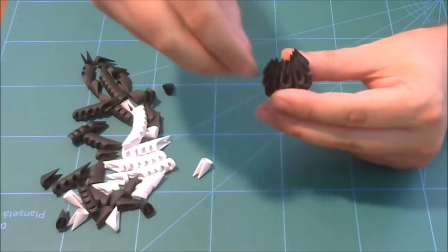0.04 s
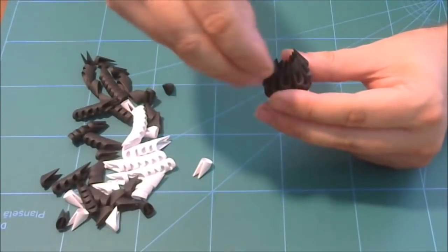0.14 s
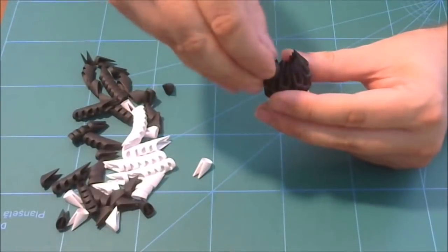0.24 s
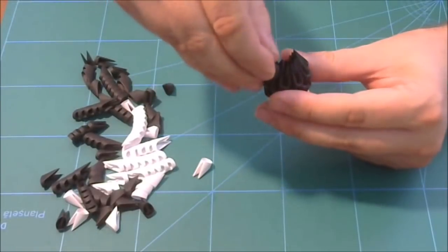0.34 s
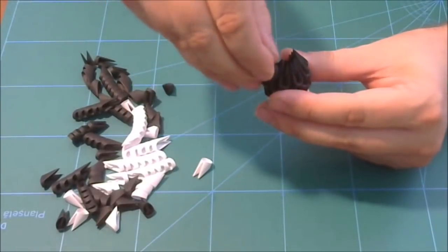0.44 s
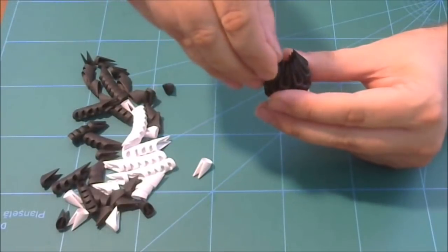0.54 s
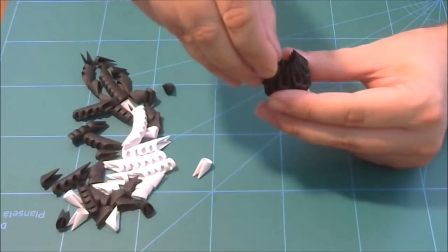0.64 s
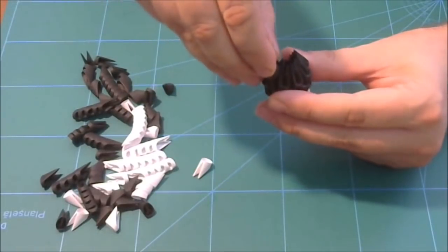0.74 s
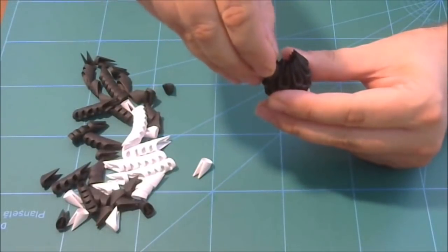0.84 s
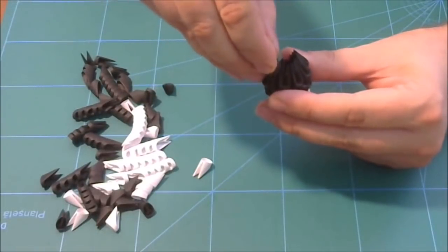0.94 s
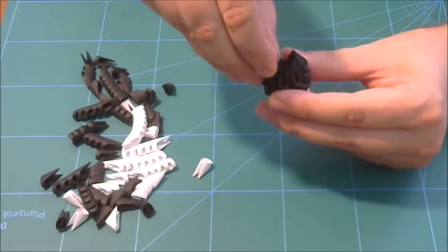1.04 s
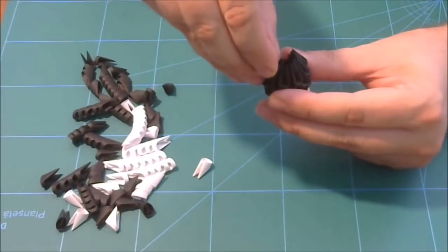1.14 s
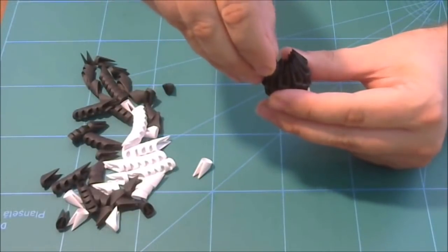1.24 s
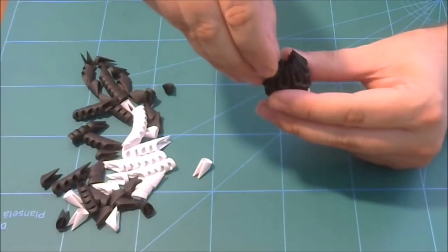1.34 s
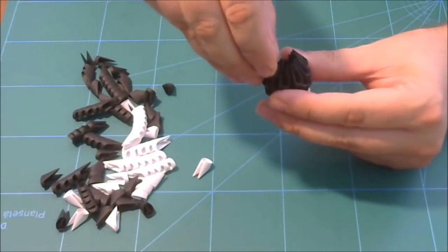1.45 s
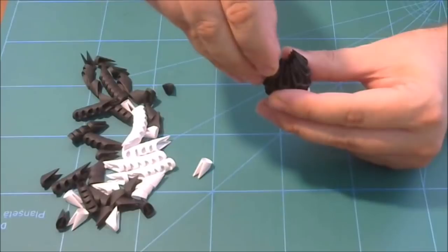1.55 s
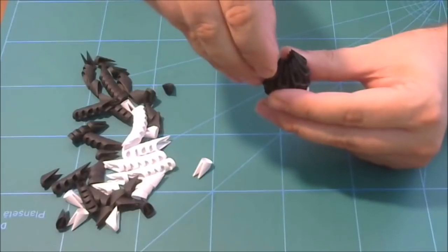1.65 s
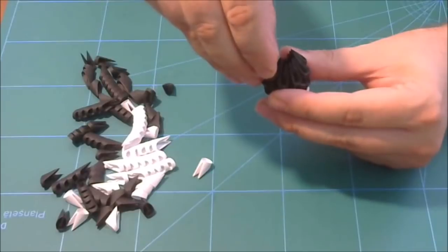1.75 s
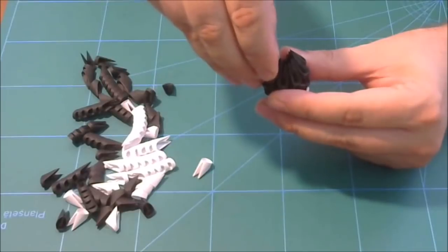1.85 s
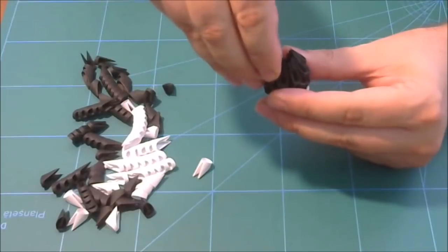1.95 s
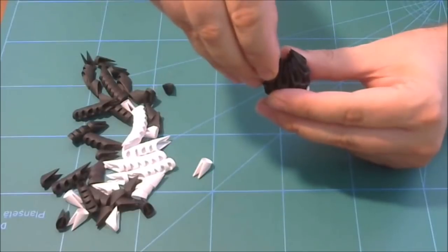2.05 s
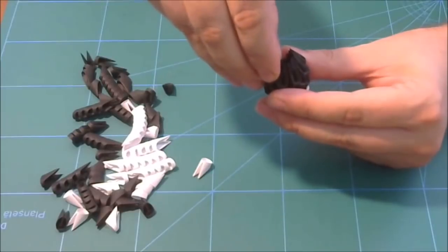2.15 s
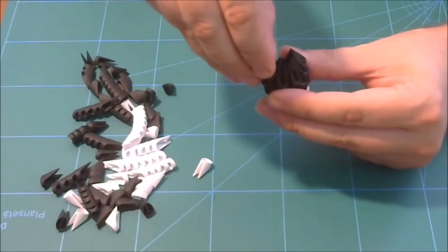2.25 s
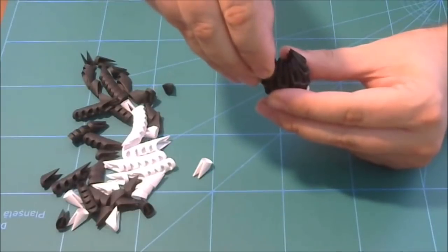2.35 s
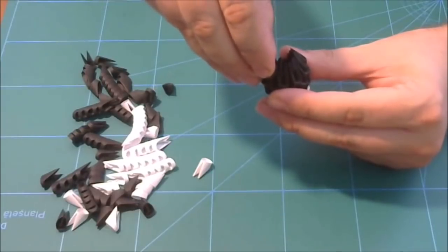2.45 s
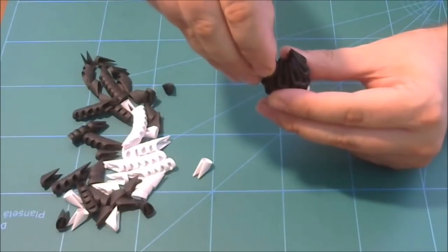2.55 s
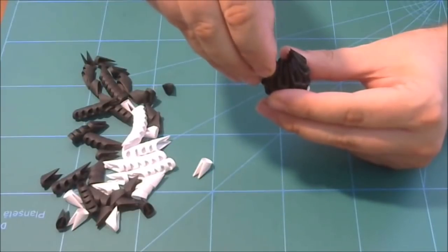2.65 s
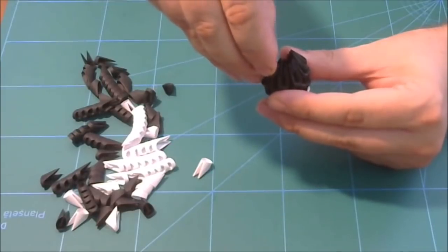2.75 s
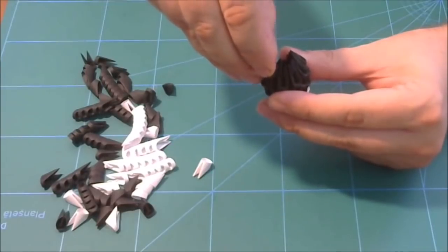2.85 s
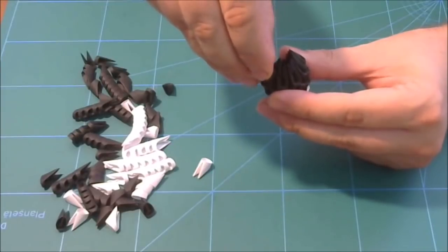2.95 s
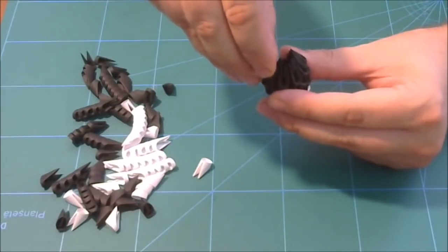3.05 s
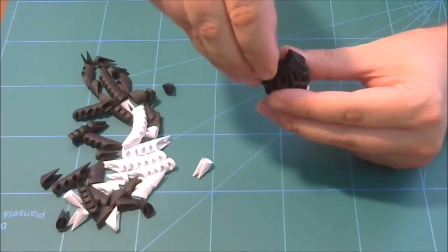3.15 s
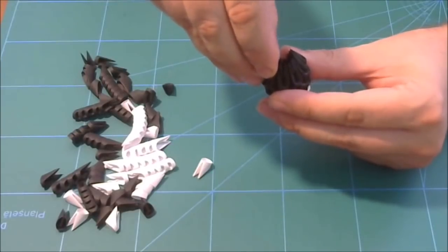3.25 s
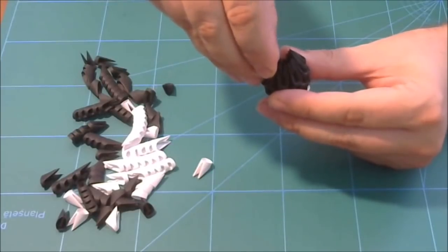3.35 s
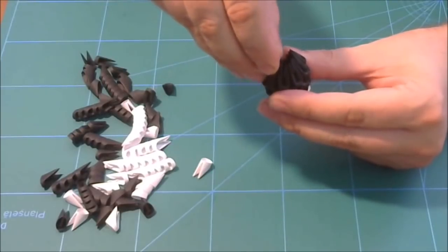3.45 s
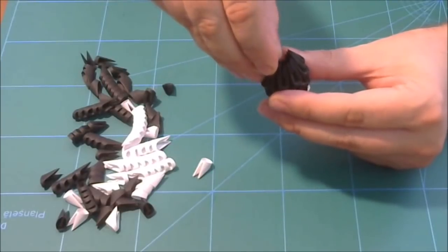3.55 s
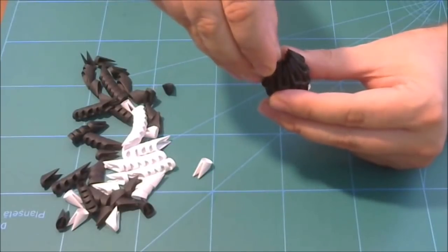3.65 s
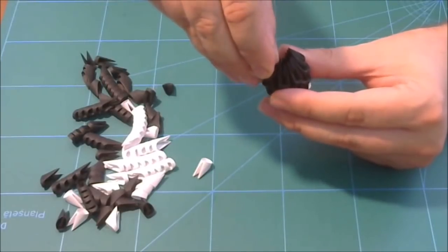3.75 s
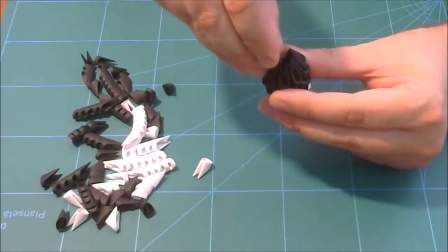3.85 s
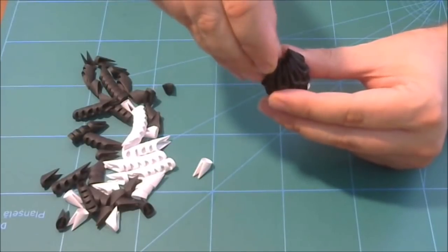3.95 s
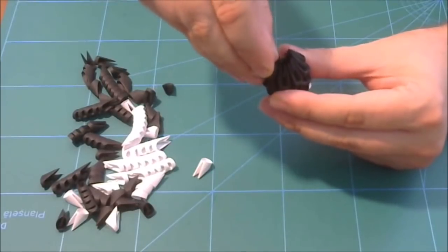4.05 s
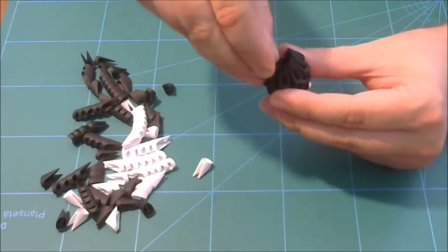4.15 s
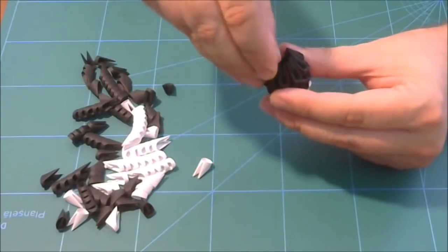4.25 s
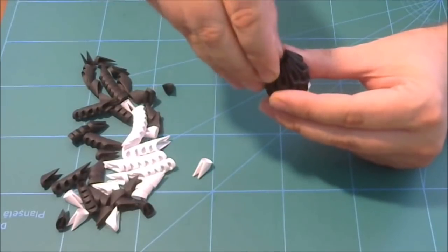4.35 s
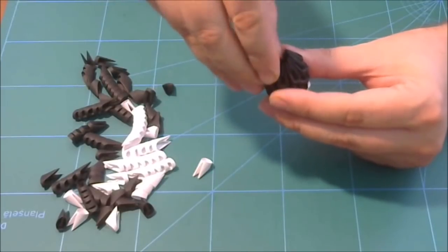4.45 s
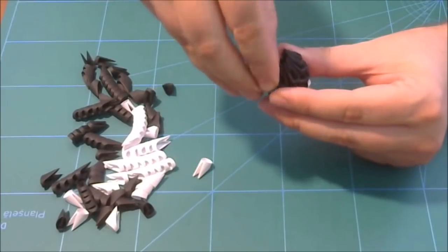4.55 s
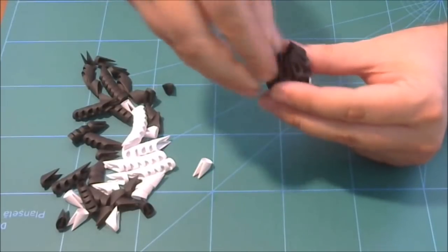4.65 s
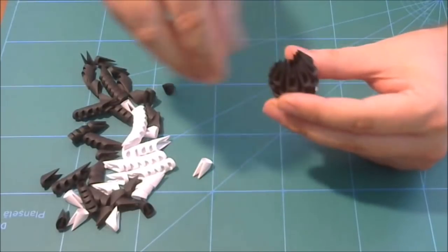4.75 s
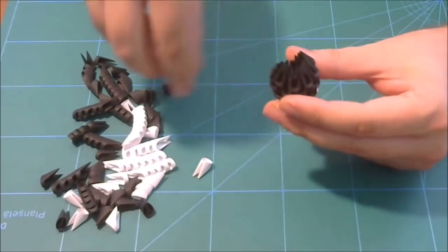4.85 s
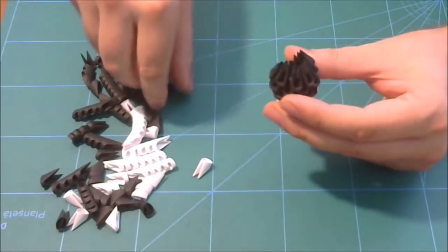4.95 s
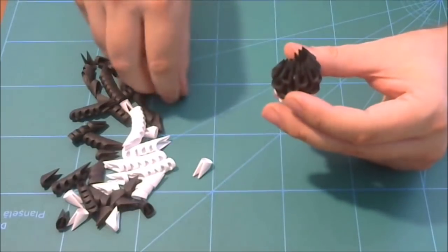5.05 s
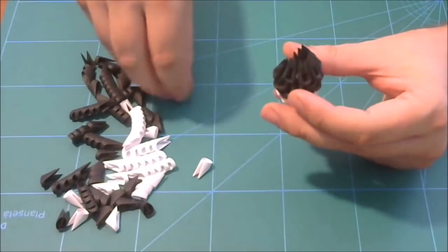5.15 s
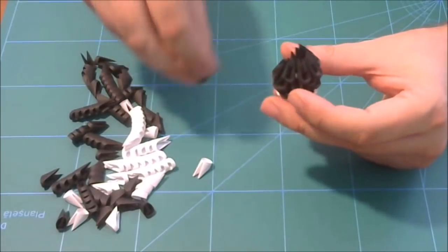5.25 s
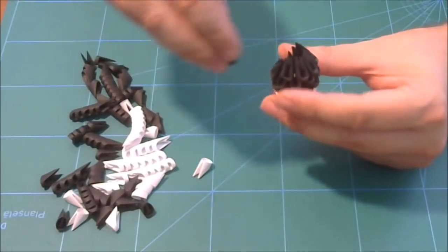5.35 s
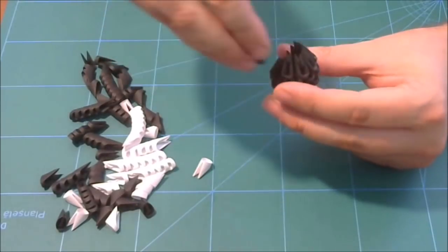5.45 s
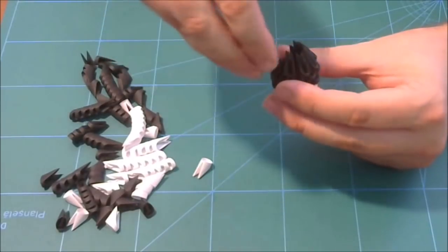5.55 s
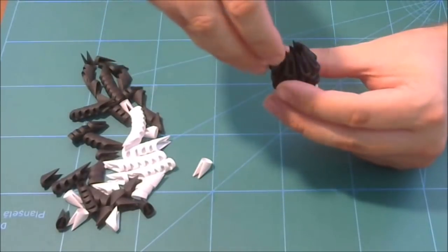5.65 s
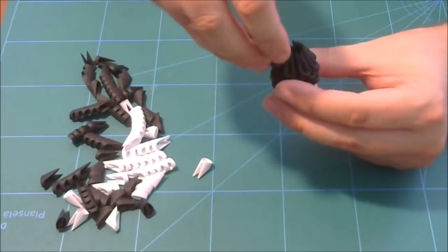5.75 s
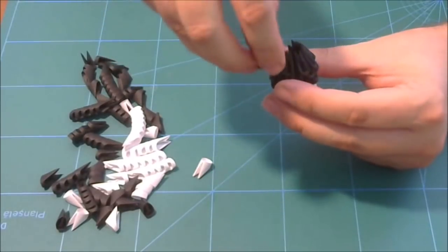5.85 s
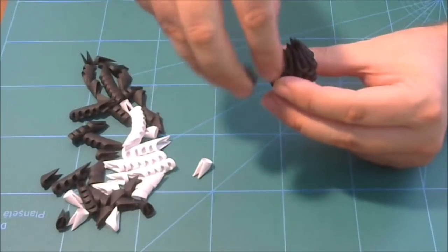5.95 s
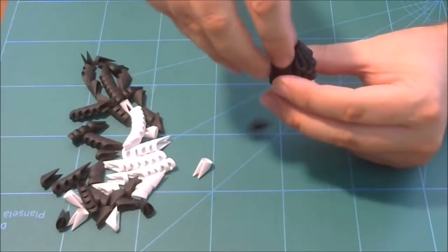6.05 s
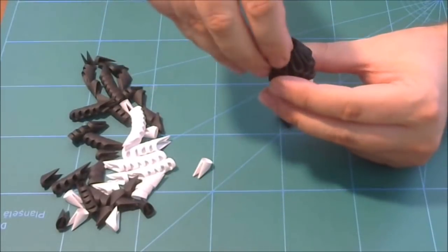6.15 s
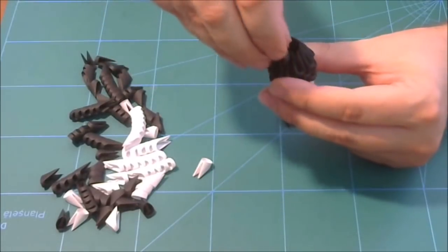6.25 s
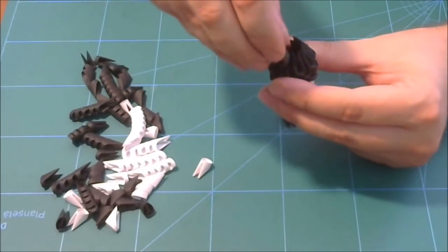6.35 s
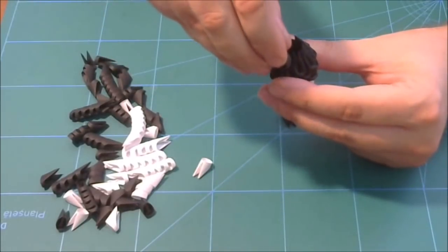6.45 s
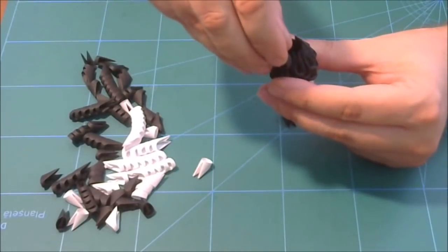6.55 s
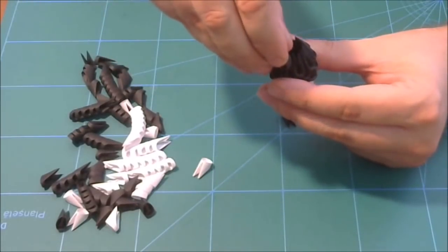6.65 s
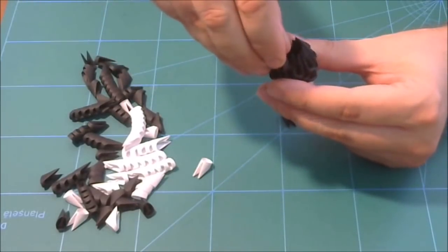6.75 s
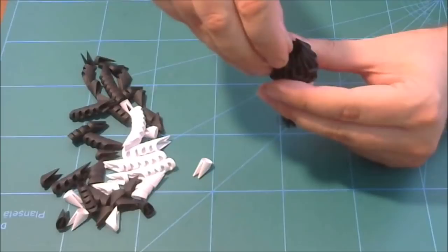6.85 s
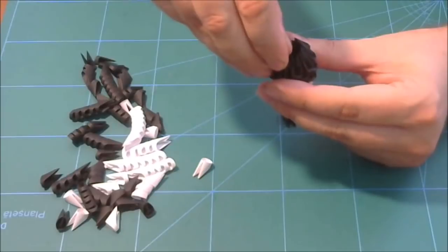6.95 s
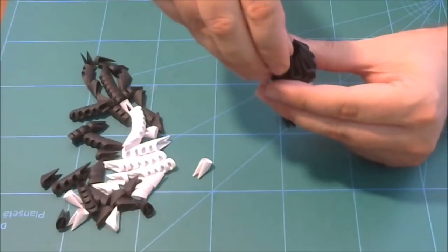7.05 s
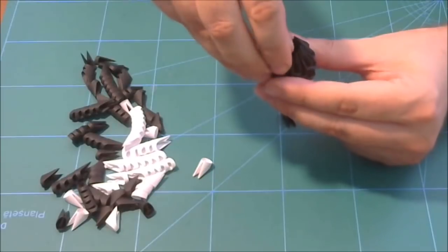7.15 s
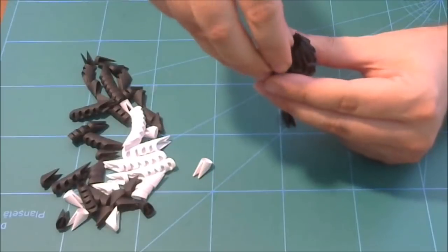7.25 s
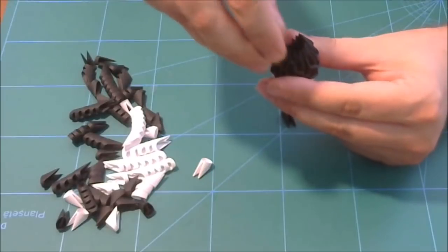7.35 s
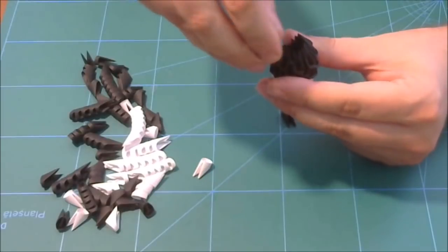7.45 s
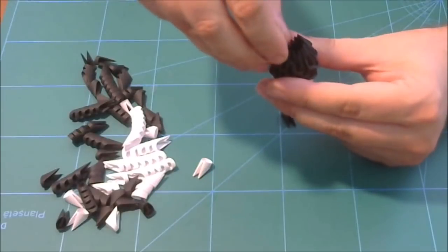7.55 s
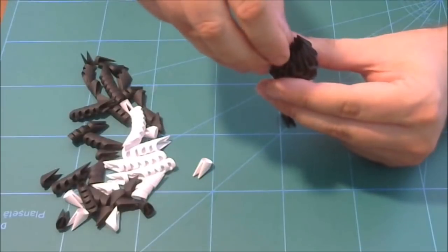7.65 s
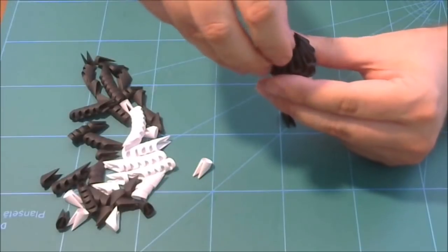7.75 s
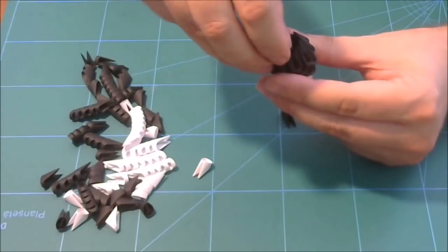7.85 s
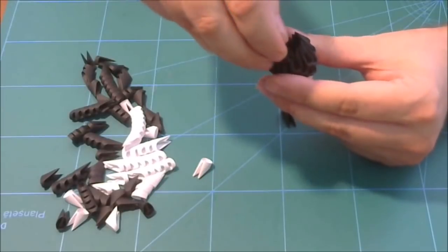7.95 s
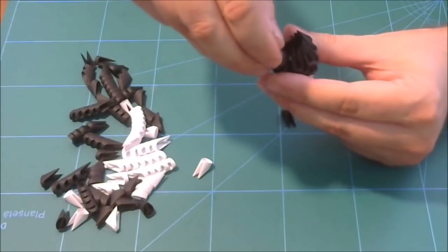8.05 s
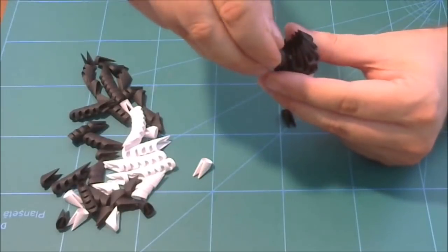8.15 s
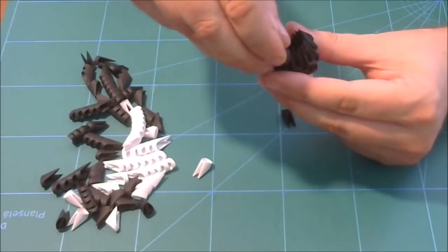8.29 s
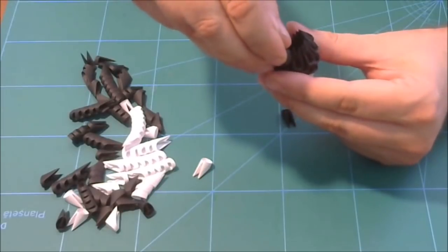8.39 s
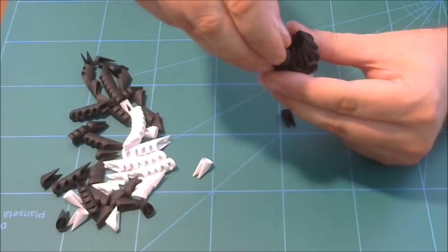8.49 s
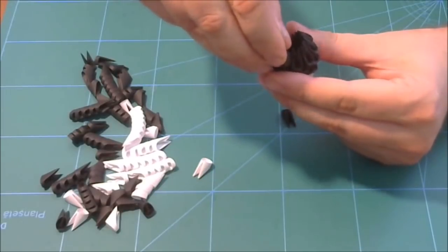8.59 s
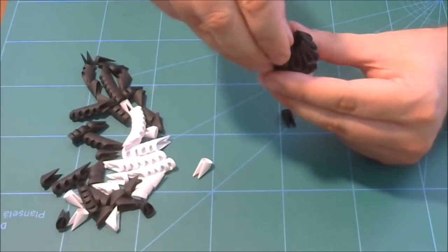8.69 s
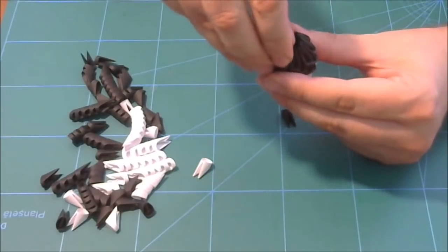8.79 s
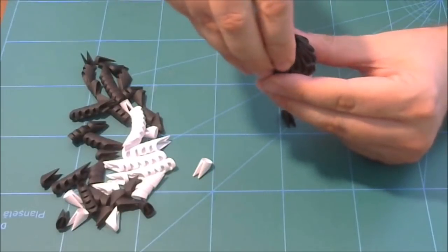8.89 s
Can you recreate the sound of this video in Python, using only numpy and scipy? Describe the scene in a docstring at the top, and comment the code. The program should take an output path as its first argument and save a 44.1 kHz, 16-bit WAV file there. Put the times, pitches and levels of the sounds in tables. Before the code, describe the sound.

In a small, quiet room with a faint steady hum, folded paper pieces tick and scrape lightly as fingers fit them together up close. A short cluster of louder clicks comes as one piece is picked off the mat. Then a piece falls, landing with the loudest click and a tiny rattle, and the sparse, soft paper scrapes and snaps resume.

```python
"""Short scrapes and snaps of paper come first: hands push small folded pieces into each other, up close.
Edges scrape as their fibres catch, and folds snap as they let go. Near 5 s a hand drags a piece off
the mat; near 6 s another drops and bounces. A small room echoes, and appliances hum over
the soft rumble of the room and the hiss of the microphone."""
import sys
import numpy as np
from scipy import signal
from scipy.fft import rfft, irfft, next_fast_len
from scipy.io import wavfile
from scipy.ndimage import uniform_filter1d, map_coordinates

SR = 44100
rng = np.random.default_rng(int(sys.argv[2]) if len(sys.argv) > 2 else 0)


def unload_audio(sound):
    """Save the sound as a 16-bit wav file, at the path given as the first command line argument."""
    columns = np.transpose(np.atleast_2d(sound))
    # keep every value between -1 and 1, then stretch to whole-number steps
    steps = np.round(np.clip(columns, -1, 1) * 32767)
    wavfile.write(sys.argv[1], SR, steps.astype(np.int16))


N = 393372
TIME = np.arange(N) / SR


def amp(db):
    return 10 ** (np.asarray(db) / 20)


def unit(x):
    return x / np.sqrt(np.mean(x ** 2) + 1e-20)


def along(points, hz):
    """Read a curve of (Hz, value) points on a log axis."""
    freqs, values = np.transpose(points)
    return np.interp(np.log(hz + 1), np.log(freqs + 1), values)


def wobble(rate):
    """A smooth random curve through `rate` points a second."""
    return map_coordinates(rng.standard_normal(int(N * rate / SR) + 4), [TIME * rate])


# Background noise: (frequency [Hz], level [dB per Hz])
ROOM_NOISE = [(25, -126), (60, -117), (95, -110), (130, -101), (170, -104), (240, -96), (350, -106),
              (420, -101), (465, -106), (505, -99), (545, -105), (1000, -112), (1500, -113), (2200, -119),
              (3500, -124), (7500, -126), (10000, -128), (15700, -130)]

def room_tone():
    """Air, far rumble and microphone hiss, slightly unsteady."""
    size = next_fast_len(N)
    gain = amp(along(ROOM_NOISE, np.fft.rfftfreq(size, 1 / SR))) * np.sqrt(SR / 2)
    return irfft(rfft(rng.standard_normal(size)) * gain, size)[:N] * amp(.4 * wobble(5))


# Appliance tones: (pitch [Hz], average level [dB])
HUM_TONES = [(100.1, -91), (120.1, -67), (141.1, -91), (200.2, -69.5), (218, -77.5), (249.2, -89),
             (281.3, -85.5), (300.2, -78), (422.6, -92), (509.3, -92.5), (563.7, -85), (1245, -96.5),
             (1369.5, -96), (1525, -94), (1618, -99)]

def appliance_hum():
    """Steady tones, barely wavering."""
    out = np.zeros(N)
    for hz, db in HUM_TONES:
        phase = 2 * np.pi * (hz * TIME + rng.random()) + .0011 * hz * wobble(3)
        out += np.sqrt(2) * amp(db + .6 * wobble(4)) * np.sin(phase)
    return out


# The room's echo: (frequency [Hz], time to fade by 60 dB [s])
ECHO_FADE = [(500, .14), (3000, 0.11), (7000, 0.16), (14000, 0.086)]

def room_echo(x, stretch_s=.15):
    """Each frequency fades at its own speed; hands move, so each stretch gets a new echo."""
    out, step = np.zeros(N + SR), round(stretch_s * SR)
    for start in range(0, N, step):
        hz, t, noise = signal.stft(rng.standard_normal(SR // 3), SR, nperseg=128)
        fade = amp(-60 * t / along(ECHO_FADE, hz)[:, None])
        tail = signal.istft(noise * fade, SR, nperseg=128)[1]
        echo = signal.fftconvolve(x[start:start + step], tail / np.linalg.norm(tail))
        out[start + 130:][:len(echo)] += echo
    return out[:N]


def puff(start, db, hz, length_s):
    """One soft touch: noise around one pitch swells and fades."""
    out, t = np.zeros(N + SR), np.arange(SR // 4) / SR
    band = signal.butter(1, [hz * .84, hz * 1.19], "band", fs=SR, output="sos")
    age = t / length_s
    swell = age * np.exp(1 - age ** 2)
    noise = swell * signal.sosfilt(np.vstack([band, band]), rng.standard_normal(2 * len(t)))[len(t):]
    out[round(start * SR):][:len(t)] = amp(db) * noise * np.linalg.norm(swell) / np.linalg.norm(noise)
    return out[:N]


# Soft touches: (time [s], level [dB], pitch [Hz])
TOUCHES = [(.3, -75, 495), (.385, -76, 2300), (.445, -75, 2320), (.71, -75, 700), (1.555, -78, 2300),
           (1.912, -72, 2420), (2.255, -69, 2420), (2.488, -69, 510), (2.59, -68, 506), (3.25, -73, 520),
           (3.85, -72, 2600), (4.358, -65.5, 820), (4.54, -67, 290), (4.6, -66.5, 573), (5.084, -60, 247),
           (5.2, -69, 250), (5.438, -67.5, 500), (6.74, -70, 560), (6.785, -68, 514), (7.04, -74, 564),
           (7.915, -72.5, 2680), (8.66, -74.5, 3020), (8.78, -77.5, 2400), (8.88, -72, 551)]

def bumps():
    """Faint, dull bumps and creases."""
    return sum(puff(start, db, hz, length_s=.016) for start, db, hz in TOUCHES)


# Where mat and table ring, highest first: (pitch [Hz], level [dB])
MAT_RINGS = [(2609, 0.5), (1552.5, -2), (1110, -7), (683, -1), (480, -1), (280, -7), (210, -7), (125, -4)]
# Hits on the mat, at its top pitch: (time [s], level [dB], length [s], loss per octave down [dB])
MAT_HITS = [(4.97, -52.5, 0.032, 14.5), (4.996, -59, .03, -1.25), (5.018, -63, 0.02, -2.3),
            (5.038, -73, 0.022, -3.5), (6.049, -49.5, .02, 6), (6.13, -60, 0.026, 23)]

def mat_thuds():
    """Light paper stirs mostly the mat's high pitches; fingers stir them all."""
    out = np.zeros(N)
    for start, db, length, loss_db in MAT_HITS:
        for hz, ring_db in MAT_RINGS:
            octaves_down = np.log2(MAT_RINGS[0][0] / hz)
            out += puff(start, db + ring_db - loss_db * octaves_down, hz, length * .87 ** octaves_down)
    return out


def paper_filter(x, shape, hz, ripple_db=2.4, size=512):
    """Give x a tone shape around hz, plus the chance peaks of one fold."""
    ripple = unit(uniform_filter1d(rng.standard_normal(size // 2 + 1), size=8))
    db = along(np.multiply(shape, [hz, 1]), np.fft.rfftfreq(size, 1 / SR)) + ripple_db * ripple
    cepstrum = irfft(np.log(amp(db)))
    cepstrum[1:size // 2] *= 2
    cepstrum[size // 2 + 1:] = 0  # so nothing rings before the touch
    pulse = irfft(np.exp(rfft(cepstrum)))
    return signal.fftconvolve(x, pulse / np.linalg.norm(pulse))[:len(x)]


# Tone of an edge: (frequency [times the centre pitch], level [dB])
EDGE_SHAPE = [(.36, -45.5), (.62, -25), (.75, -11), (.87, -6), (1.03, 2), (1.13, -8), (1.26, -9),
              (1.5, -25), (1.75, -35), (1.9, -42), (2.2, -46.5)]

def thin_edge(x, hz):
    """A thin paper edge sounds bright."""
    return paper_filter(x, EDGE_SHAPE, hz)


# Tone of a piece: (frequency [times the centre pitch], level [dB])
PIECE_SHAPE = [(.2, -48), (.5, -29.5), (.7, -16), (.8, -4), (1.1, 0.5), (1.3, -3), (1.8, -24.5), (3, -51.5)]

def folded_piece(x, hz):
    """A whole folded piece sounds duller."""
    return paper_filter(x, PIECE_SHAPE, hz)


def grit(share, spread_db):
    """Fibres catching: tiny clicks of mixed size over fine noise, in bunches."""
    catches = (rng.random(N) < share) * rng.standard_normal(N) * amp(spread_db * rng.standard_normal(N))
    return unit((unit(catches) + .99 * rng.standard_normal(N)) * amp(4.1 * wobble(250)))


def rustle(span, swell, grits, edge_hz, piece_hz, piece_db):
    """One stretch of grit sounds through both edge and piece."""
    edge = thin_edge(swell * grits[0][span], edge_hz)
    piece = folded_piece(amp(piece_db) * swell * grits[1][span], piece_hz)
    return np.pad(edge + piece, (span.start, N - span.start - len(edge)))


# A piece is dragged off the mat; another slips and lands, tumbles, skids to rest:
# (edge pitch [Hz], piece pitch [Hz], piece share [dB], list of (time [s], level [dB]))
PIECE_MOVES = [(6450, 3420, -7.5, [(4.962, -74), (4.969, -40), (5.0, -38.5), (5.012, -44.5), (5.035, -50.5),
               (5.06, -57.5), (5.09, -63.5), (5.14, -71.5), (5.18, -84)]), (7300, 6600, -14.5, [(6.0, -87),
               (6.012, -62.5), (6.048, -61), (6.053, -43.5), (6.075, -43), (6.11, -56.5), (6.14, -75)]),
               (6500, 3200, -2.5, [(6.115, -70), (6.145, -54.5), (6.165, -57), (6.19, -53.5), (6.21, -55),
               (6.235, -75)]), (7350, 4850, -5, [(6.19, -80), (6.225, -52), (6.248, -53), (6.258, -71),
               (6.28, -85)])]

def drag_and_drop(grits):
    """Paper drags and skids; its landing leaves a short rattle and room echo."""
    out = np.zeros(N)
    for edge_hz, piece_hz, piece_db, levels in PIECE_MOVES:
        times, db = np.transpose(levels)
        span = slice(round(times[0] * SR), round(times[-1] * SR))
        swell = amp(np.interp(TIME[span], times, db))
        out += rustle(span, swell, grits, edge_hz, piece_hz, piece_db)
    return out


# Scrapes in the hands: (peak time [s], level [dB], 10 dB rise [ms], 10 dB fall [ms], piece share [dB])
SHORT_SCRAPES = [(.005, -66.5, 12, 45, -21), (0.078, -55, 22, 12.5, -14), (.309, -77.5, 7, 13, -10),
                 (.391, -57, 10, 12, -11), (0.445, -54.5, 4.5, 14, -15), (0.464, -59, 4, 20, -1),
                 (.54, -65, 6, 12, -8), (.887, -72, 12, 30, -19), (.956, -70.5, 20, 15, -15),
                 (1.022, -64, 10, 34, -5), (1.242, -66.5, 24, 17, -5.5), (1.477, -55, 4, 16.5, -7.5),
                 (1.563, -66.5, 8, 14, -8), (1.673, -62.5, 13.5, 19, -12), (1.92, -52, 17.5, 17, -2.5),
                 (2.024, -60.5, 15, 17, -11.5), (2.105, -62.5, 12, 15.5, -9),
                 (2.264, -52.5, 16.5, 16.5, -3.5), (2.49, -76, 10, 11, -6), (2.785, -71, 6, 18, -2),
                 (2.813, -61.5, 7, 10, -2), (2.936, -48, 3, 22.5, -4), (3.255, -76.5, 13, 7, -1),
                 (3.479, -61.5, 17, 19, 0.5), (3.689, -65.5, 19, 24, 3), (3.738, -62.5, 24, 14.5, 1.5),
                 (3.862, -49, 18, 20, -1), (3.986, -61.5, 19, 25, -6), (4.065, -64.5, 15, 15, -9),
                 (4.24, -85, 28, 30, -1), (4.312, -58, 25.5, 23, -15), (4.364, -49, 5, 23, -8),
                 (4.478, -66.5, 20, 26, -11), (4.697, -59.5, 19, 15, -8.5), (5.409, -50, 6, 13, -23),
                 (5.515, -76, 17, 21, -18), (5.912, -80.5, 15, 14, -7), (6.74, -63, 4, 20, -15),
                 (6.824, -56, 22, 16, -4.5), (6.958, -83.5, 25, 48, -7), (7.062, -72, 23, 23, -19),
                 (7.207, -76, 15, 10, -21), (7.308, -56, 10.5, 15.5, -16.5), (7.714, -71, 16, 25, -10),
                 (7.878, -68, 13.5, 19.5, -14), (7.91, -47, 11, 34.5, -13.5), (8.024, -64, 5, 11, -19),
                 (8.062, -67, 6, 8, -9), (8.091, -81, 16, 18, -7), (8.133, -73.5, 7, 9, -13),
                 (8.335, -78.5, 25, 16, -7), (8.569, -69, 8.5, 13, -13), (8.65, -68, 6, 5, -12),
                 (8.673, -58.5, 31, 21, -10), (8.789, -57, 14, 15.5, -20)]

def strokes(grits, edge_hz=7200, piece_hz=4430):
    """Each stroke swells and fades with the sliding speed of the paper."""
    out = np.zeros(N)
    for peak, db, rise_ms, fall_ms, piece_db in SHORT_SCRAPES:
        detune = np.exp(.041 * rng.standard_normal(2))
        rise, fall = rise_ms / 1000, fall_ms / 1000
        span = slice(max(round((peak - 4 * rise) * SR), 0), round((peak + 4 * fall) * SR))
        t = TIME[span] - peak
        swell = amp(db - 10 * (np.abs(t) / np.where(t < 0, rise, fall)) ** 1.65)
        out += rustle(span, swell, grits, edge_hz * detune[0], piece_hz * detune[1], piece_db)
    return out


# Folds and tips snapping: (time [s], level [dB], edge pitch [Hz], piece pitch [Hz], piece share [dB])
FOLD_SNAPS = [(.0786, -41.5, 7050, 4280, -5), (.391, -42.5, 7690, 3340, -15), (.4418, -44, 7010, 3220, -16),
              (.4653, -43, 6940, 4340, -2), (.535, -57, 6360, 3270, -8), (1.0208, -44, 7170, 4550, -4.5),
              (1.4767, -38.5, 5430, 4040, -4.5), (1.5612, -51, 6490, 3160, -15),
              (1.6762, -45, 7110, 4410, -17), (1.9049, -48, 6660, 4690, -2), (1.9135, -42, 6950, 4400, -8),
              (2.1065, -51, 7090, 4700, -10), (2.252, -46, 7000, 4200, -5),
              (2.7853, -48.5, 7130, 4700, -13), (2.8096, -41.5, 6200, 4260, -11),
              (2.9351, -33.5, 6400, 4290, -0.5), (3.8354, -45, 5790, 4770, -14),
              (3.8472, -37, 6110, 4470, -3), (4.3522, -53, 6710, 3430, -13),
              (4.3635, -26, 6900, 3410, -4.5), (4.7014, -40.5, 7020, 4570, -6),
              (4.9681, -33, 6620, 3950, -10.5), (4.9741, -17.5, 6380, 4160, -14.5),
              (4.9854, -21.5, 6460, 3790, -5.5), (4.9942, -23, 6210, 3560, -9),
              (5.0027, -19, 6600, 3960, -9), (5.0052, -23, 6790, 4030, -14.5),
              (5.0309, -28.5, 6180, 3850, -10), (5.0826, -44, 6400, 3300, 2),
              (5.1154, -40.5, 6310, 4450, -8), (5.4065, -37, 6900, 4260, -26),
              (6.0509, 0, 7005, 3670, -22.5), (6.0624, -19, 7170, 3160, -16),
              (6.0671, -21, 7270, 3730, -9.5), (6.1286, -34, 5990, 3720, -6),
              (6.1397, -20.5, 5830, 3480, -6), (6.1731, -22.5, 6400, 3520, -14),
              (6.1921, -32, 6140, 3660, -9), (6.2045, -33, 6460, 4160, -9), (6.2259, -31.5, 8190, 4540, -8),
              (6.7379, -36, 7190, 3500, -23), (7.3012, -45, 7480, 3920, -24),
              (7.9068, -34.5, 7300, 4550, -22), (7.9874, -55, 7500, 2560, -15),
              (8.0213, -41.5, 7130, 3240, -29), (8.0574, -55, 7230, 3100, -9),
              (8.0842, -61, 8070, 2700, -6), (8.127, -57, 8290, 2710, -12),
              (8.5638, -53.5, 7290, 3150, -13), (8.649, -49, 7000, 3800, -10),
              (8.7871, -50, 6950, 2750, -17)]

def snaps():
    """A fold lets go with a tiny crack; the edge rings briefly at two pitches, the piece at one."""
    out, t = np.zeros(N + SR), np.arange(SR // 30) / SR
    low_cut = signal.butter(4, 2300, "high", fs=SR, output="sos")
    onset = (1 - np.exp(-t / .00016)) ** 2
    for start, db, edge_hz, piece_hz, piece_db in FOLD_SNAPS:
        crack = rng.standard_normal((2, len(t))) * amp(-60 * t / .0055) * onset
        pair = np.sin(2 * np.pi * edge_hz * 1.05 * t) + .7 * np.sin(2 * np.pi * edge_hz * .92 * t)
        edge = .7 * thin_edge(crack[0], edge_hz) + amp(-60 * t / .006) * onset * pair
        ring = amp(-60 * t / .0095) * onset * np.sin(2 * np.pi * piece_hz * t)
        piece = .67 * folded_piece(crack[1], piece_hz) + .65 * ring
        snap = signal.sosfilt(low_cut, edge + amp(piece_db) * piece)
        out[round(start * SR):][:len(t)] += amp(db - 1.5) * snap / np.abs(snap).max()
    return out[:N]


def scene():
    """Paper and its echo over the background, in one channel."""
    clicks = snaps()
    grits = grit(.12, spread_db=2), grit(.08, spread_db=4)  # edge, piece
    rustles = strokes(grits) + drag_and_drop(grits)
    echo = room_echo(amp(-12.5) * clicks + amp(-19.5) * rustles)
    return (clicks + rustles + echo + bumps() + mat_thuds() + appliance_hum() + room_tone())[None]


def record(dry, top_hz=15750):
    """The camera keeps nothing above top_hz."""
    size = next_fast_len(N + 8192)
    return irfft(rfft(dry, size) * (np.fft.rfftfreq(size, 1 / SR) < top_hz), size)[:, :N]


dry = scene()
out = record(dry)
unload_audio(out)
```